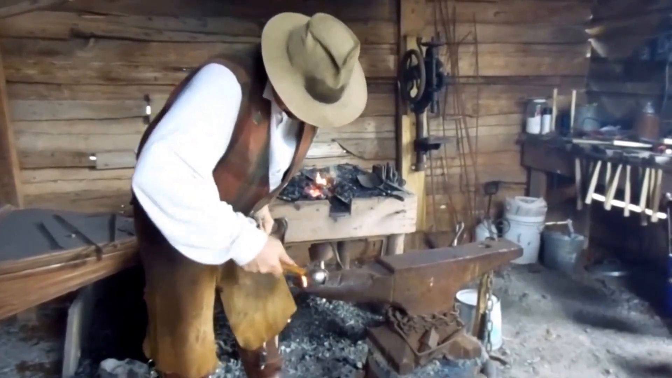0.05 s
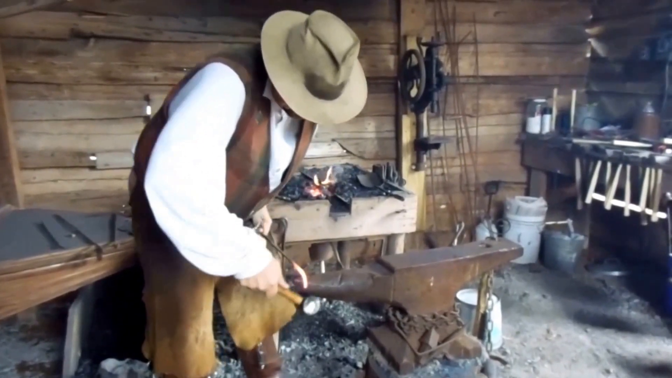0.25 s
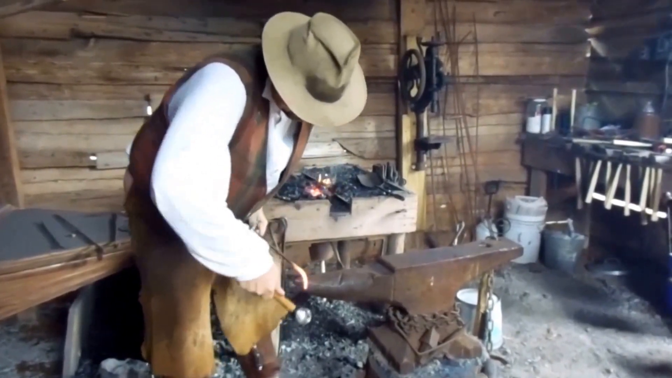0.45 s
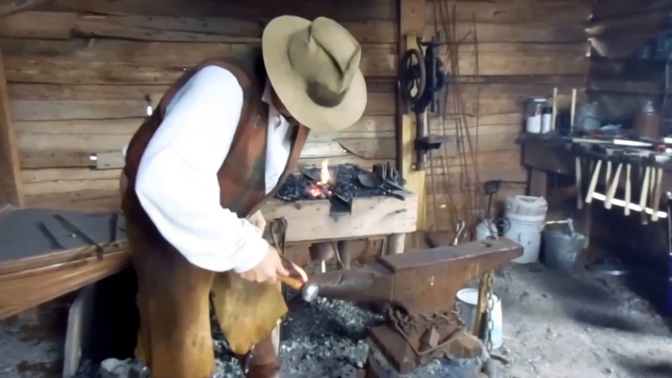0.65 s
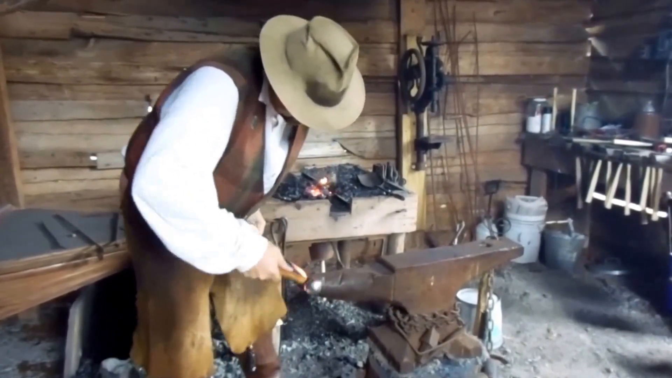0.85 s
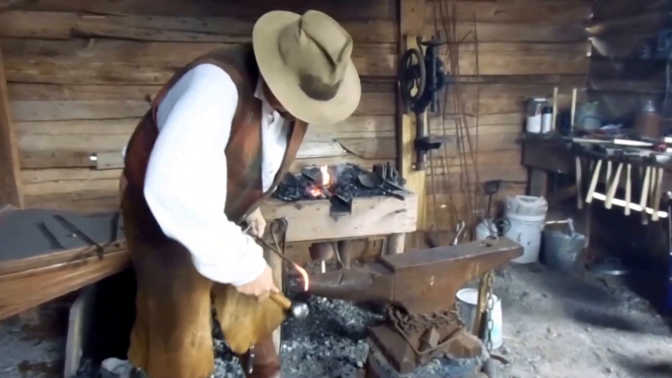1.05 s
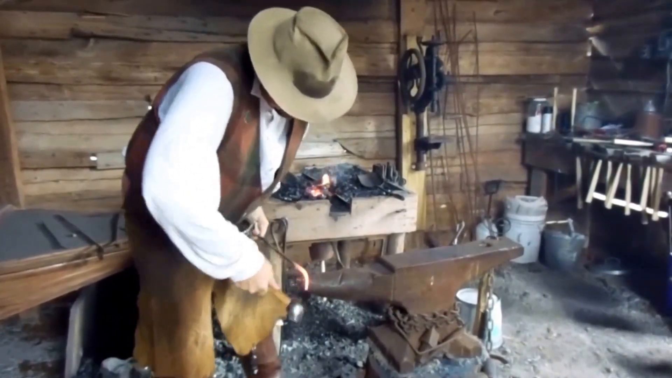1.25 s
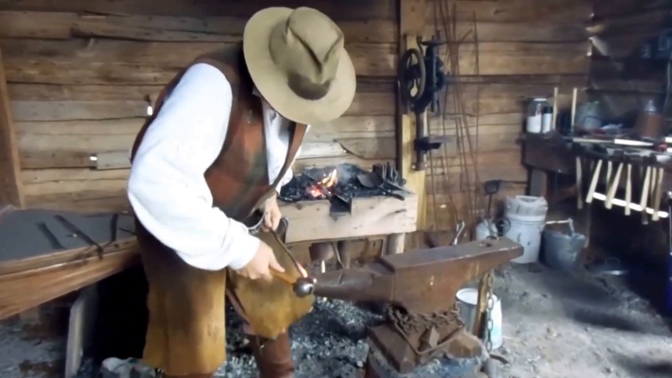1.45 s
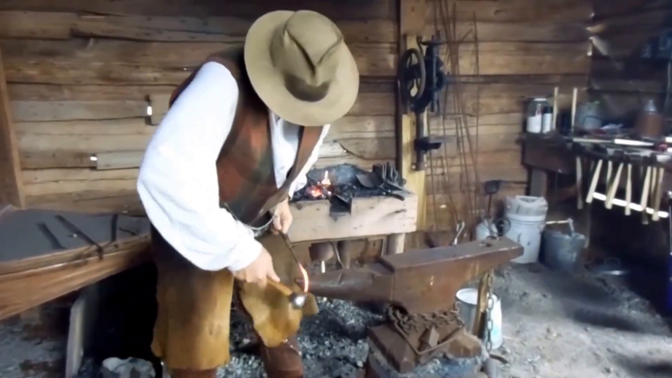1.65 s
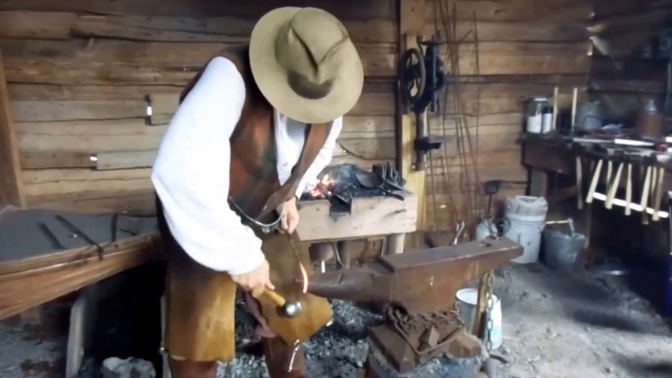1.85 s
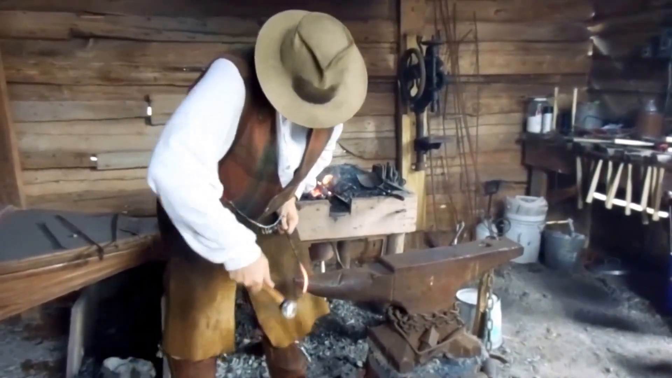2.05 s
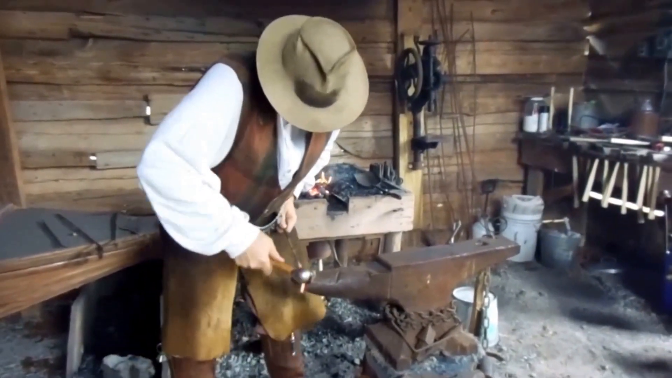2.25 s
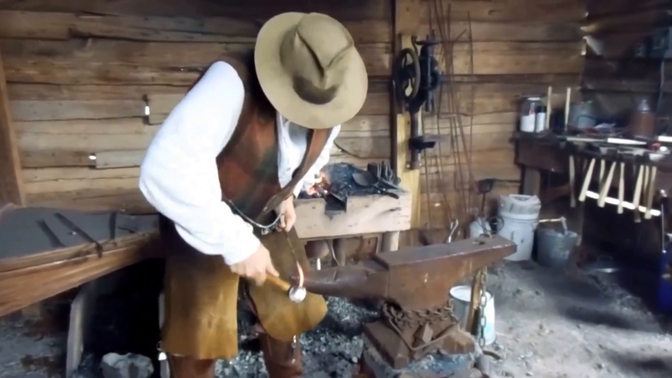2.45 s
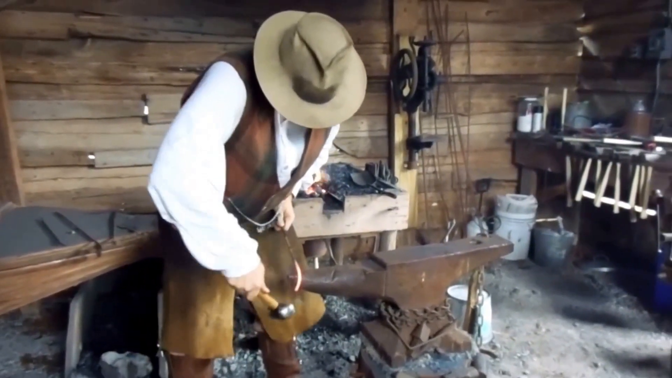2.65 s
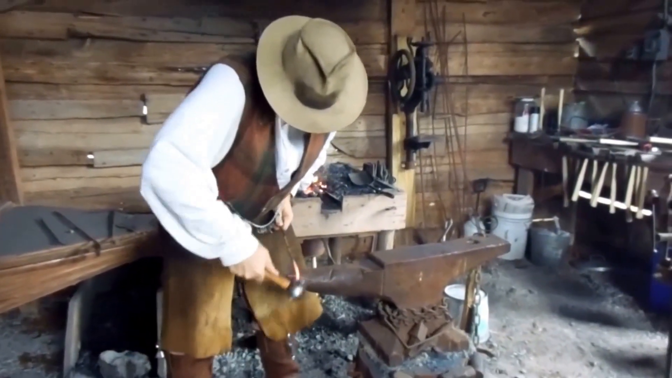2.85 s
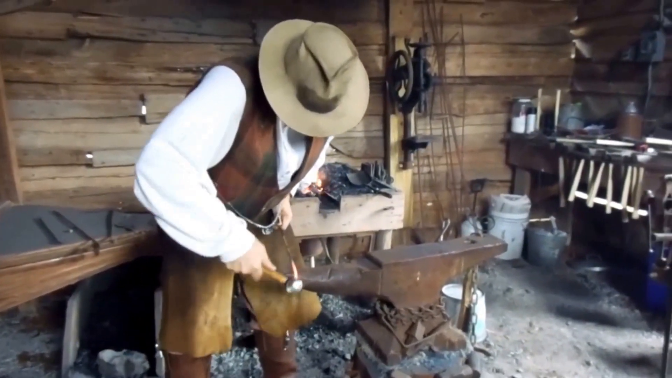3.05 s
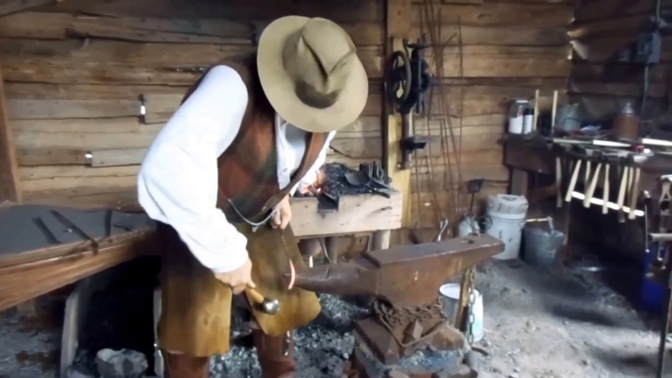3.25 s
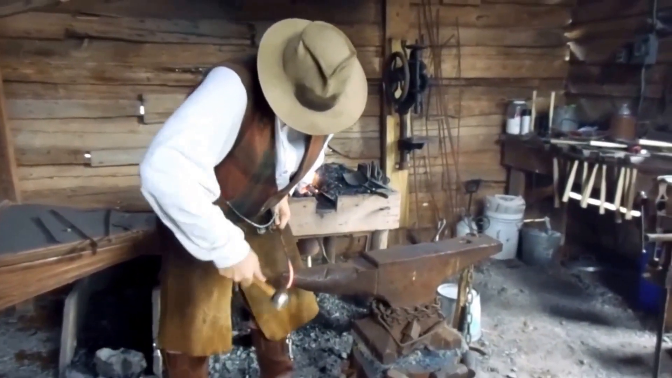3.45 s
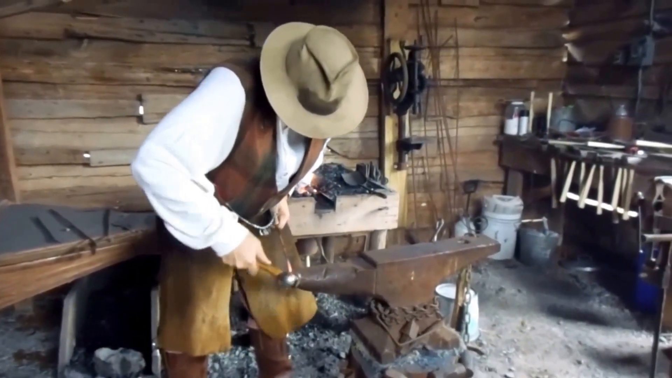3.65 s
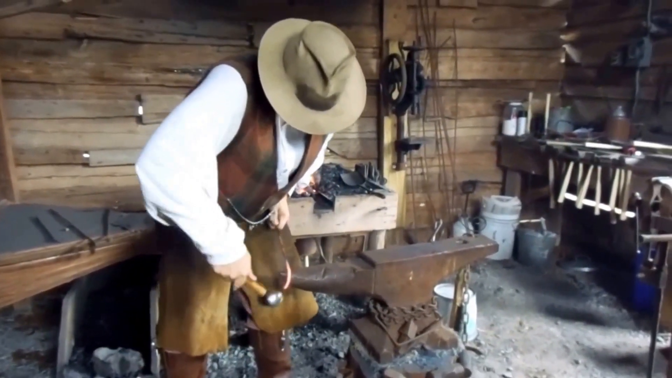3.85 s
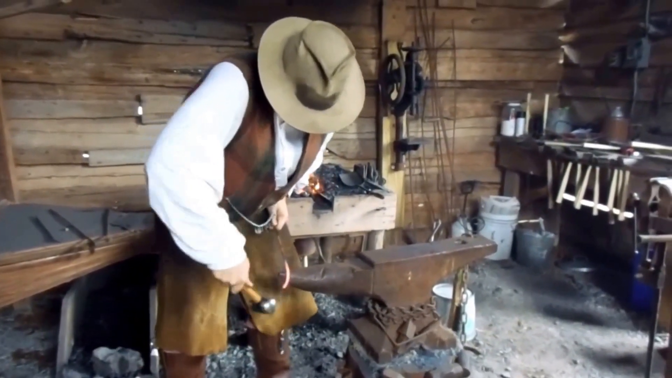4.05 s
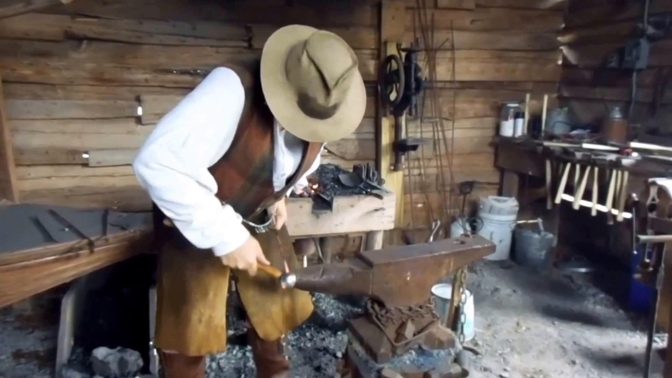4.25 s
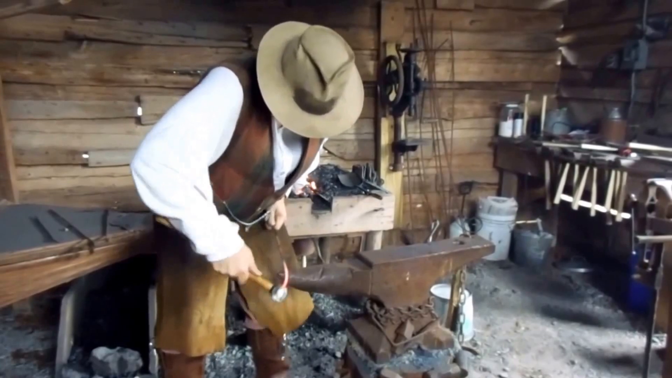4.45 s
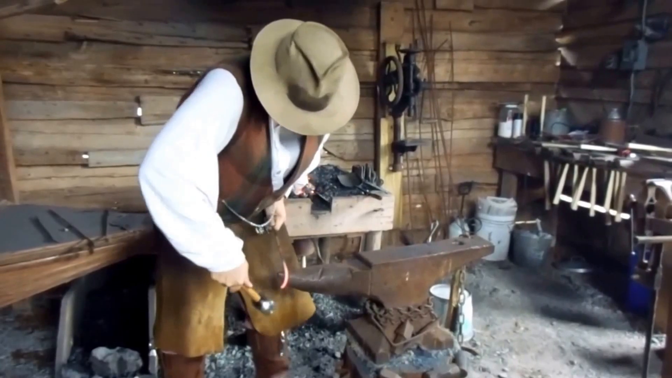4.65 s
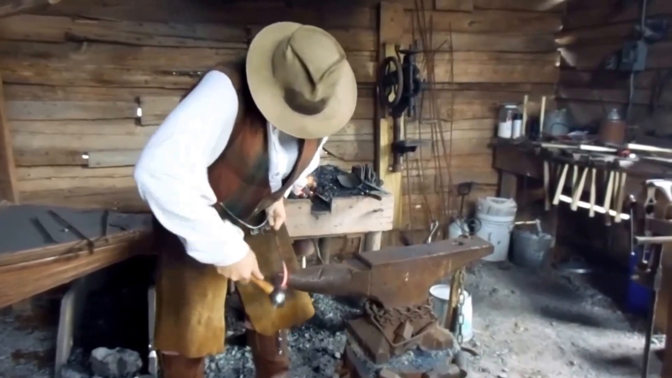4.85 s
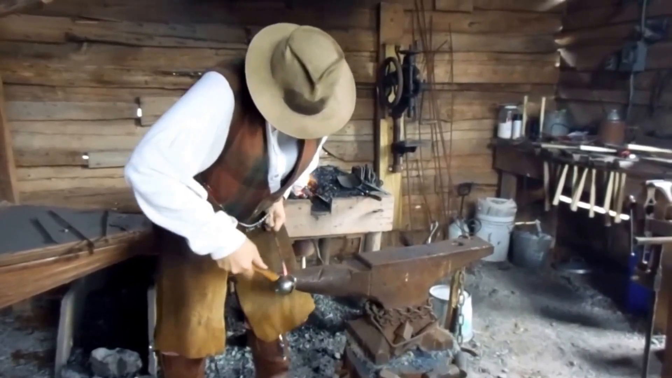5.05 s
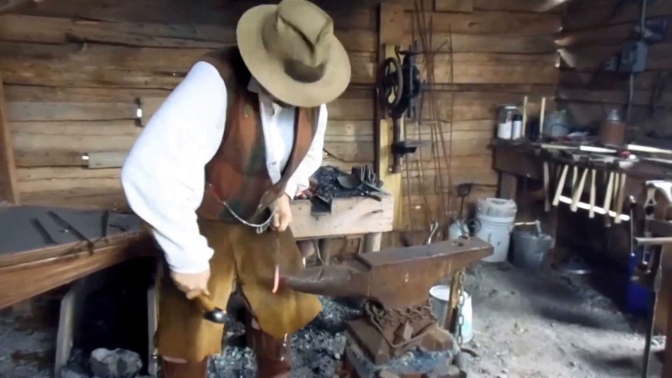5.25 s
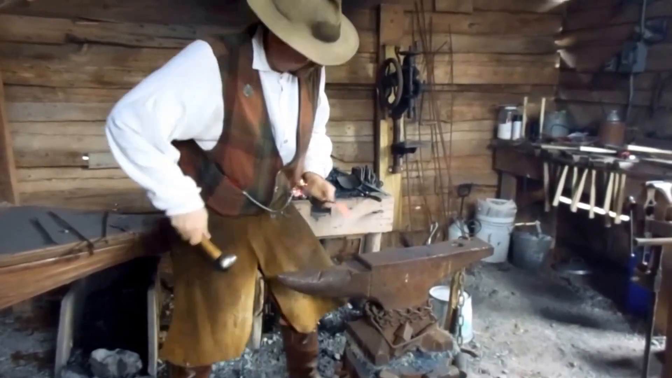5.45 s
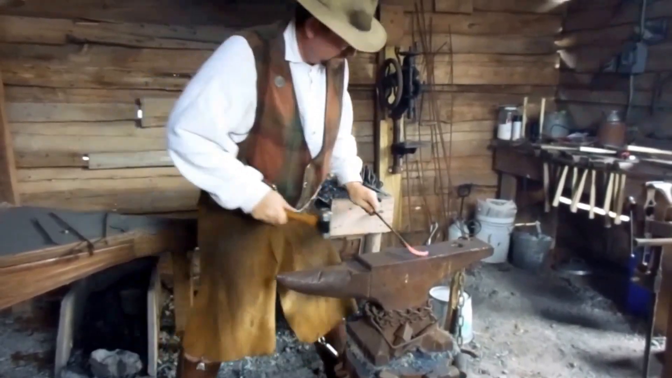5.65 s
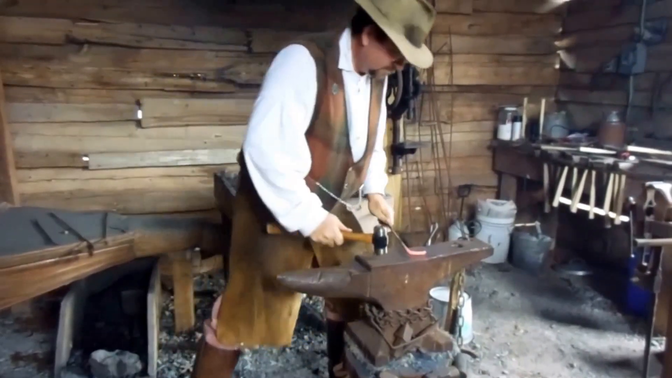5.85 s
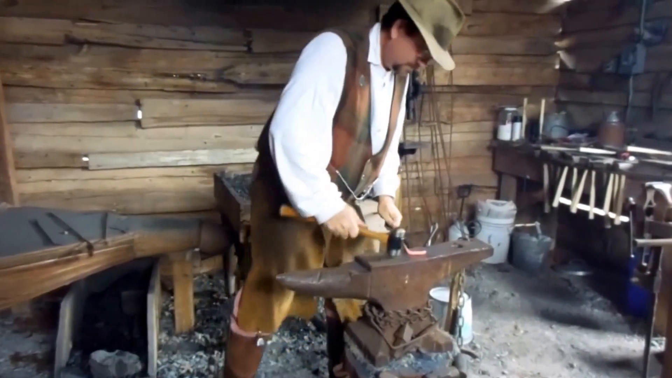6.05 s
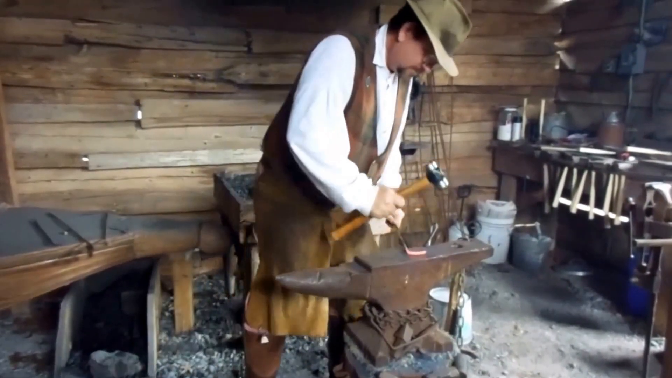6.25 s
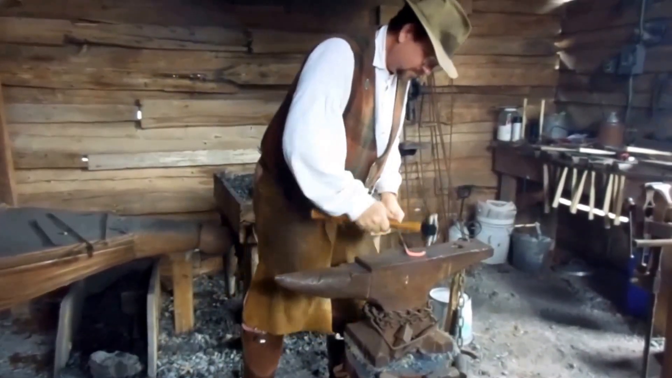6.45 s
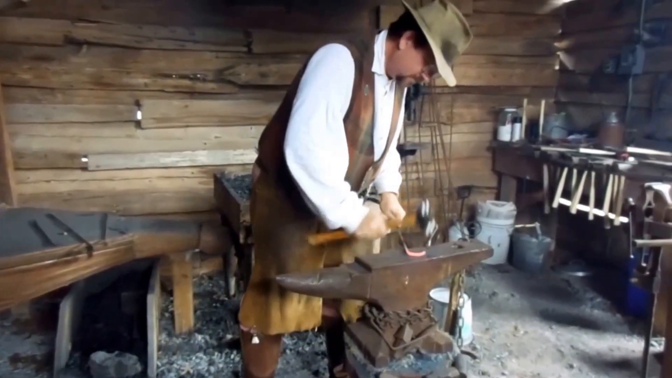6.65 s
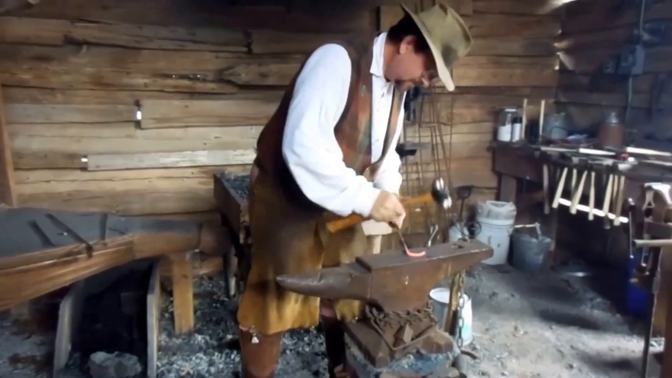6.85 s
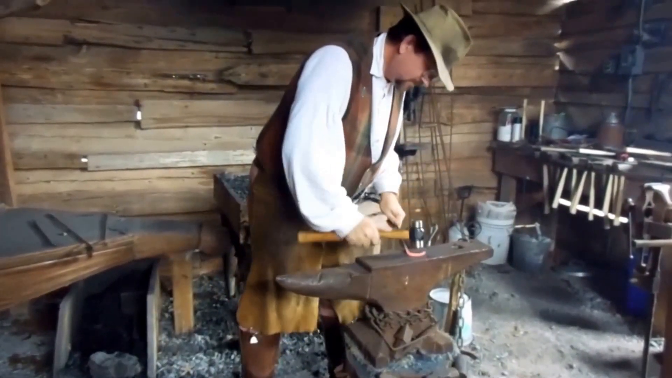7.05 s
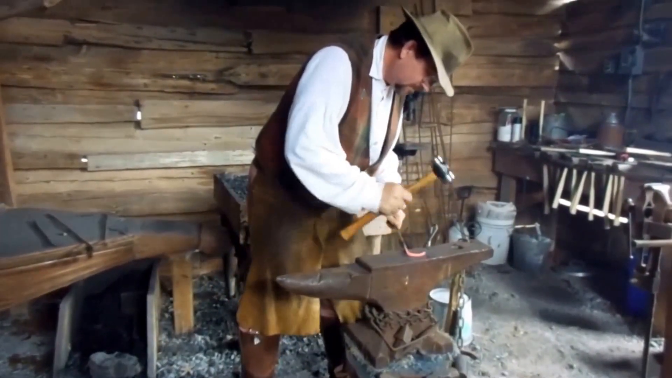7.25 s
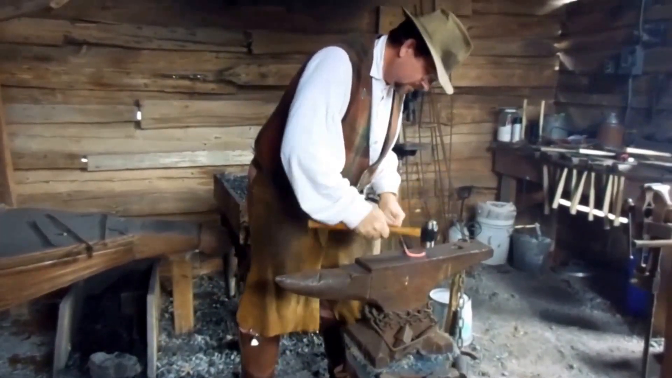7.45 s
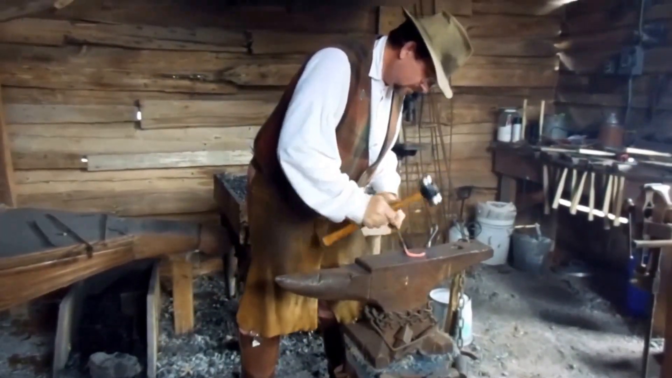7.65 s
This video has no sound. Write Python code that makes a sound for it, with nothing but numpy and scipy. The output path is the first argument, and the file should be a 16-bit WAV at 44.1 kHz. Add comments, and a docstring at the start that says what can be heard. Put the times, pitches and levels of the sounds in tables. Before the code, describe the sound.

Close up in a small wooden forge, a hammer hits hot iron on an anvil horn about three and a half times a second, each blow a bright, short, damped clack, some with a quick bounce. After five seconds it pauses; tongs clink, metal scrapes and boots crunch gravel. Two light taps follow, then four slower, heavier blows ring longer with more thud. A fire rumbles softly behind, in stereo.

```python
"""Smith at the anvil

A smith hammers a hot iron bar, first round the horn of an anvil, then on its face, in a small log workshop.
Each blow is a burst of noise bands that cracks, thuds into the stump and sets the anvil's modes ringing.
Between blows the tongs clink and scrape, tiny high chirps sound and boots shift on the gravel.
The forge fire, shaped noise, rumbles and hisses behind; two microphone ports hear the work and the room."""
import sys
import numpy as np
from scipy import signal
from scipy.fft import rfft, irfft, next_fast_len
from scipy.io import wavfile

SR = 44100
rng = np.random.default_rng(int(sys.argv[2]) if len(sys.argv) > 2 else 0)


def transcribe(signal):
    """Save signal, clipped to [-1, 1], as a 16-bit WAV file at the path in sys.argv[1]."""
    frames = np.atleast_2d(signal).T
    limited = np.clip(frames, -1, 1)
    pcm = np.round(limited * 32767).astype(np.int16)
    wavfile.write(sys.argv[1], SR, pcm)


N = 339570


def amp(db):
    """Decibels to gain."""
    return 10 ** (np.asarray(db) / 20)


def rms_one(x):
    """Scaled to rms 1."""
    return x / np.sqrt(np.mean(x ** 2) + 1e-20)


def at_hz(points, hz):
    """A table over frequency, read on a log axis."""
    points = np.array(points)
    return np.interp(np.log(hz), np.log(points[:, 0]), points[:, 1])


def band(x, low_hz, high_hz):
    """Band-pass."""
    return signal.sosfilt(signal.butter(2, [low_hz, high_hz], "band", fs=SR, output="sos"), x)


def grainy(shape, swing_db, most):
    """White noise with exponentially distributed gains in dB, so that rare grains stand out."""
    noise = rng.standard_normal(shape)
    return noise * amp(swing_db * np.minimum(rng.exponential(1, shape), most))


def swell(start, length, db, power=2):
    """A smooth rise and fall."""
    progress = np.clip((np.arange(N) / SR - start) / length, 0, 1)
    return amp(db) * np.sin(np.pi * progress) ** power


def clicks(seconds, db):
    """Impulses of given levels at given times."""
    out = np.full(N, 1e-18)
    np.add.at(out, np.round(np.asarray(seconds) * SR).astype(int), amp(db))
    return out


def chatter(x, noise, db, seconds):
    """After each click loose steel keeps touching: noise that fades with the given time constant."""
    fade = signal.lfilter([0, 1], [1, -np.exp(-1 / (seconds * SR))], x)
    return x + amp(db) * noise * fade


def ring(x, hz, t60):
    """A two-pole resonator: a unit click sets a decaying sine of starting height 1 ringing."""
    r, w = amp(-60 / (t60 * SR)), 2 * np.pi * hz / SR
    return signal.lfilter([0, np.sin(w)], [1, -2 * r * np.cos(w), r * r], x)


ON_FACE_FROM_S = 5.48  # the work moves from the horn to the face


def struck(modes, seconds, family_db, edges_hz, spread_db, chatter_db, chatter_s, t60_shares):
    """Every hit strikes every mode with the strength of its family and a little chance.
    t60_shares(Hz) scales the decay before and after the work moves to the face."""
    luck = rng.normal(0, spread_db, (len(seconds), len(modes)))
    noise = rms_one(grainy(N, 4.7, 6))
    family = np.searchsorted(edges_hz, np.array(modes)[:, 0])
    move = int(ON_FACE_FROM_S * SR)
    out = 0
    for k, (hz, db, t60) in enumerate(modes):
        hits = clicks(seconds, family_db[family[k]] + db + luck[:, k])
        touch = chatter(hits, noise, chatter_db, chatter_s)
        early, late = t60_shares(hz)
        on_horn = ring(touch[:move], hz, t60 * early)
        on_face = ring(touch[move:], hz, t60 * late)
        out = out + np.r_[on_horn, on_face]
    return out


# how alike diffuse sound is at the left and right port: (frequency [Hz], likeness [0-1])
LIKENESS = [(60, 0.98), (500, 0.93), (2000, 0.78), (5000, 0.28), (13000, 0.037)]


def diffuse(length, shape):
    """Half-octave bands of partly alike stereo noise, each multiplied by shape(centre Hz)."""
    edges = 22 * 2 ** np.arange(0, 10, .5)
    white = rng.standard_normal((2, 2, length))
    out = 0
    for k, (low, high) in enumerate(zip(edges, edges[1:])):
        centre = np.sqrt(low * high)
        mid, side = band(white[k % 2], low, high)
        alike = np.clip(at_hz(LIKENESS, centre), 0, 1)
        stereo = np.sqrt(1 + alike) * mid + np.sqrt(1 - alike) * side * [[1], [-1]]
        out = out + shape(centre) * stereo
    return out


# vigour of the fire: (time [s], relative level [dB])
FORGE = [(0, 4), (1.0, 6), (1.7, 3.5), (2.15, -1), (4, -4.5), (4.9, -1), (5.4, -6.5), (6.1, 5), (6.8, -3),
         (7.7, -1.5)]
# colour of the fire: (frequency [Hz], relative level per Hz [dB])
FIRE = [(20, -5), (38, -4.5), (60, -5.5), (120, -10), (240, -16.5), (400, -21), (600, -26.5), (950, -28.5),
        (1500, -36.5), (2600, -39), (5000, -41), (8500, -43.5), (13500, -42.5)]
FIRE_DB, RUMBLE_FOLLOWS, HISS_FOLLOWS = -45.5, 0.3, 0.76  # rms level; shares of the roar's swing
WHINE_HZ, WHINE_WIDTH_HZ, WHINE_DB = 13190, 160, -77
HUM_LOW_HZ, HUM_HIGH_HZ = 120.3, 126.315
HUM_START_S, HUM_LENGTH_S, HUM_DB = 5.92, .36, -44


def forge():
    """Rumble, roar and hiss of the fire follow its vigour unequally; a faint whistle and a brief hum lie on top."""
    vigour = np.interp(np.arange(N) / SR, *np.transpose(FORGE))

    def colour(hz):
        follows = np.interp(np.log(hz), np.log([80, 500, 5000]), [RUMBLE_FOLLOWS, 1, HISS_FOLLOWS])
        return amp(at_hz(FIRE, hz) + follows * vigour)

    fire = rms_one(diffuse(N, colour))
    half_width = WHINE_WIDTH_HZ / 2
    whine = rms_one(band(rng.standard_normal(N), WHINE_HZ - half_width, WHINE_HZ + half_width))
    hum = rms_one(band(rng.standard_normal(N), HUM_LOW_HZ, HUM_HIGH_HZ))
    hum = hum * swell(HUM_START_S, HUM_LENGTH_S, HUM_DB, power=0.47)
    return amp(FIRE_DB) * fire + amp(WHINE_DB) * whine + hum


# hammer blows, all levels relative: (time [s], bright crack [dB], dull crack [dB], ring at 1400 Hz [dB],
# ring of the 1500 Hz pair [dB], of the 1600-2000 Hz pair [dB], of the body [dB], at 12 kHz [dB])
BLOWS = [(0.1169, -8, -33, -41.5, -22, -57, -36, -25), (0.3942, -7.5, -40, -41.5, -21, -50, -38, -22.5),
         (0.6582, -4.5, -44.5, -35, -25.5, -65, -45, -29), (0.9181, -7.5, -39, -39, -25, -35, -31.5, -25),
         (1.2103, -4.5, -32, -38, -15.5, -38.5, -31, -57), (1.4935, -1, -31.5, -30, -18.5, -54, -27, -38),
         (1.7787, -2.5, -34.5, -46, -25.5, -53, -33.5, -48), (2.039, -0.5, -38, -47, -27, -63, -40, -36),
         (2.3135, -10.5, -42, -52, -41.5, -40, -32.5, -48),
         (2.5914, -3, -52.5, -51.5, -42.5, -42.5, -28, -49),
         (2.8696, -8, -44.5, -59, -39.5, -60.5, -35.5, -51), (3.1573, -4, -45, -57.5, -38.5, -64, -36, -34),
         (3.4439, -7.5, -52, -44, -32.5, -38, -36, -57), (3.7314, -3.5, -38, -41.5, -38, -37, -34.5, -52),
         (4.0105, -7.5, -53, -42.5, -30, -36.5, -39, -53), (4.2914, -8, -41.5, -43, -27, -36, -35.5, -50),
         (4.575, -4, -58, -38.5, -27.5, -39, -36, -61), (4.8486, -3, -39, -48, -35, -35, -37.5, -57),
         (5.1297, -2.5, -43.5, -44, -25, -38, -41.5, -64),
         (5.8612, -41, -25.5, -24.5, -25.5, -30, -18, -50), (5.9667, -11, -50.5, -29, -61, -44, -18, -35),
         (6.0186, -43, -65, -30, -46, -38, -29, -34.5), (6.3697, 2.5, -23.5, -34, -23.5, -33, -36, -58),
         (6.7034, 4, -24.5, -31.5, -23, -52, -34.5, -38), (7.049, -6, -25.5, -28, -32, -26, -23.5, -21.5),
         (7.4057, -8, -23.5, -25.5, -53.5, -26, -22, -21.5)]
# the hammer bounces and lands again: (time [s], relative level of the bright crack [dB])
REBOUNDS = [(0.9314, -3.5), (1.2213, -2), (1.504, 3.5), (1.7874, -23), (2.0467, -13), (2.3339, -16),
            (2.6135, -14), (2.891, -21.5), (3.4643, -14.5)]
REBOUND_DULL_LOSS_DB, REBOUND_RING_LOSS_DB = 17, 5.5  # against the blow before


def contacts():
    """Blows, then rebounds: each has its own bright crack, but less dull crack and ring than the blow before."""
    blows, rows = np.array(BLOWS), []
    for s, bright in REBOUNDS:
        before = blows[np.searchsorted(blows[:, 0], s) - 1]
        dull = before[2] - REBOUND_DULL_LOSS_DB
        rings = before[3:] - REBOUND_RING_LOSS_DB
        rows.append([s, bright, dull, *rings])
    return np.vstack([blows, rows]).T


THUD_DB, THUD_FOLLOWS = -22.5, 0.34  # thud into the stump under a 0 dB dull crack; share of its swing


def stump_thud(dull):
    """The wooden stump takes up part of the dull crack's swing; gives the thud in dB."""
    return THUD_DB + THUD_FOLLOWS * dull


# modes of the anvil, the lowest five from its wooden stump:
# (frequency [Hz], relative level [dB], t60 on the face [s])
ANVIL = [(137, -6, .11), (190, -3, .07), (250, -3, .07), (324, -4, .09), (400, -6, .06), (870, -12, .08),
         (1030, -13, .07), (1398, 0, .26), (1501, -1, .12), (1545, -9, .1), (1591, 0, .19), (2015, -8, .15),
         (3033, -4, .21), (3111, 1.5, .22), (3225, -8, .14), (3978, -2, .19), (4689, -12, .2),
         (5069, 1, .18), (5363, -5, .22), (6213, 3, .2), (6381, -2, .4), (6633, 4, .15), (7117, -7, .18),
         (8560, 0, .14), (9717, -3, .1), (11110, -9, .24), (12122, -1, .2), (13260, -8, .13)]
# borders between the families of modes that share one strength: (frequency [Hz])
FAMILY_EDGES_HZ = [600, 1200, 1450, 1550, 2500, 3500, 4500, 5800, 6300, 6500, 7500, 10500, 11500, 12600]
# share of the body ring in the families 3, 4, 5, 6.2, 6.4, 6.6, 8.5, 11 and 13 kHz, on horn and face: (level [dB])
BODY_FROM_HORN = [0.5, -0.5, -9, -18.5, -16.5, -11.5, -11, -19, -17.5]
BODY_FROM_FACE = [-1.5, -1.5, -5.5, -14.5, -5.5, -17, -16, -4.5, -19.5]
# how far each of these families follows the 12 kHz ring instead of the body: (share [0-1])
WITH_TREBLE = [0, 0, 0, 0, .4, 0, 0, .5, 0]
KNOCK_DB = 0.5  # the modes near 900 Hz against the dull crack
# the bar held against the horn shortens the rings, the upper ones most
HORN_T60_SHARE, HORN_LOW_T60_SHARE, HORN_DAMPS_ABOVE_HZ = .5, .8, 2500
TOCK_S, TOCK_DB, TOCK_HZ, TOCK_T60_S = 3.2455, -35, 980, 0.02  # one small dull knock between blows


def anvil():
    """Each contact sets decaying modes of anvil and stump ringing, damped while the bar lies on the horn."""
    s, _, dull, lowest, pair, upper_pair, body, treble = contacts()
    from_body = np.where(s > ON_FACE_FROM_S, np.c_[BODY_FROM_FACE], np.c_[BODY_FROM_HORN])
    *others, top = body + np.c_[WITH_TREBLE] * (treble - body) + from_body
    family_db = [stump_thud(dull), dull + KNOCK_DB, lowest, pair, upper_pair, *others, treble, top]

    def t60_shares(hz):
        return (HORN_T60_SHARE if hz > HORN_DAMPS_ABOVE_HZ else HORN_LOW_T60_SHARE), 1

    out = struck(ANVIL, s, family_db, FAMILY_EDGES_HZ, spread_db=2.5,
                 chatter_db=-31.5, chatter_s=0.02, t60_shares=t60_shares)
    return out + ring(clicks([TOCK_S], [TOCK_DB]), TOCK_HZ, TOCK_T60_S)


GRAZE_DB, GRAZE_S, CRACK_MS = -10.5, .0016, 2.36  # first touch against the landing; its length; the crack's fade
RATTLE_DB, RATTLE_YIELDS = -29.5, .25  # the bar rattles less against the crack, the harder the blow pins it
MIDDLE_FACE_DB, MIDDLE_WITH_BODY = -9.5, 0.33  # on the face the middle crack follows the body ring
MIDDLE_HORN_DB, MIDDLE_FOLLOWS = -30.5, 0.42  # on the horn: under a 0 dB bright crack; share of its swing


def hammer():
    """The hammer grazes the scale, then lands: a noise burst in four bands, with the loose bar's grainy rattle."""
    s, bright, dull, _, _, _, body, _ = contacts()
    on_face = s > ON_FACE_FROM_S
    middle_on_face = MIDDLE_FACE_DB + MIDDLE_WITH_BODY * body
    middle = np.where(on_face, middle_on_face, MIDDLE_HORN_DB + MIDDLE_FOLLOWS * bright)
    thud = stump_thud(dull)
    rattle = RATTLE_DB - RATTLE_YIELDS * np.where(on_face, 0, bright)

    t = np.arange(SR // 4) / SR
    fade = np.exp(-np.maximum(t - GRAZE_S, 0) * 1000 / CRACK_MS)
    landing = np.where(t < GRAZE_S, amp(GRAZE_DB), fade)
    out = np.zeros(N)
    for k, start in enumerate(np.round((s - .0014) * SR).astype(int)):
        rattling = amp(rattle[k] - 60 * t / 0.18) * (t > GRAZE_S) * grainy(len(t), 4.9, 4)
        crack = landing * rng.standard_normal(len(t)) + rattling
        # neighbouring bands alternate in sign so that they join without a notch;
        # narrow bands pass less noise and get more gain
        burst = amp(bright[k] - 4.0) * band(crack, 6900, 13200)
        burst -= amp(middle[k] + 14.0) * band(crack, 1780, 6020)
        burst += amp(dull[k] + 21.5) * band(crack, 643, 1940)
        burst -= -amp(thud[k] + 28.0) * band(crack, 163, 340)  # the thud lies apart and keeps its sign
        out[start:start + len(t)] += burst
    return out


# tiny high chirps, perhaps from the anvil's chain: (time [s], relative level [dB])
CHIRPS = [(.229, -58), (.309, -51), (.587, -50), (2.199, -50), (2.8, -79), (3.089, -58.5), (3.4, -61.5),
          (3.869, -58.5), (5.019, -56), (5.074, -58.5), (5.492, -56), (6.186, -41.5), (6.627, -47.5),
          (6.908, -55.5), (7.017, -49), (7.335, -51), (7.556, -49.5)]
# modes of the chain: (frequency [Hz], relative level [dB], t60 [s])
CHAIN = [(8500, -4, 0.032), (8630, -5, .04), (10550, -1, .03)]
UPPER_LINK_DB = -9  # the mode above 9500 Hz against the others


def chain():
    """Faint clicks set three short high modes chirping."""
    s, db = np.transpose(CHIRPS)
    return struck(CHAIN, s, [db, db + UPPER_LINK_DB], [9500], spread_db=3.5,
                  chatter_db=-25, chatter_s=0.01, t60_shares=lambda hz: (1, 1))


# clinks of the tongs, levels relative: (time [s], tick [dB], low prong [dB], high prongs [dB])
CLINKS = [(.5387, -38, -70, -68), (.842, -23, -46.5, -64), (1.379, -28, -42, -38.5),
          (1.444, -13.5, -38, -58), (1.6513, -30, -46, -51), (1.6642, -39.5, -36.5, -39),
          (1.6885, -35, -56, -42.5), (1.709, -38, -53, -56), (1.9874, -38, -52, -44.5),
          (2.0611, -25, -29.5, -50), (2.2503, -46.5, -58, -60), (2.405, -26, -38.5, -47),
          (2.5321, -29, -42.5, -46), (5.097, -39, -54.5, -57), (5.343, -50, -49.5, -63.5),
          (5.5158, -12, -42, -54), (5.5479, -40, -39.5, -35.5), (5.6502, 1, -31, -31.5),
          (5.668, -17, -44.5, -58), (5.688, -1, -42, -50), (5.712, -24.5, -39, -42), (5.755, -11, -45, -36),
          (5.817, -33, -51, -45), (5.9055, -6.5, -36, -42), (5.95, -30, -28.5, -38),
          (6.0453, -25, -42.5, -41), (6.1306, -32, -56, -50.5), (6.219, -31, -65, -53),
          (6.273, -21, -46.5, -48), (6.321, -34, -48.5, -43), (6.338, -23, -41.5, -48)]
# modes of the tongs: (frequency [Hz], relative level [dB], t60 when not held [s])
TONGS = [(1814, -24, .16), (3171, -14, .15), (3528, -12, .08), (4170, -9, .1), (4262, -2, .12),
         (4350, -11, .08), (5180, -16, .1), (6142, -14, .1), (6907, -6, .15), (7531, -4, .1),
         (7612, -5, .12), (8690, -7, .12), (8840, -5, .12), (9370, -6, .12), (10550, -12, .1),
         (11630, -5, .1), (12070, -6, .1), (12880, -10, .1), (13050, -4, .1), (13140, -2, .13),
         (14170, -9, .15)]
# border between the low and high prong modes: (frequency [Hz])
PRONG_EDGES_HZ = [6000]
GRIP_T60_SHARE = 0.61  # the hand on the reins shortens the ring


def tongs():
    """Jaws and reins of the tongs tick together, a short noise burst, and ring in damped modes."""
    s, tick, *prongs = np.transpose(CLINKS)
    rings = struck(TONGS, s, prongs, PRONG_EDGES_HZ, spread_db=2.5, chatter_db=-25, chatter_s=0.025,
                   t60_shares=lambda hz: (GRIP_T60_SHARE, GRIP_T60_SHARE))
    ticks = chatter(clicks(s, tick + 1), rng.standard_normal(N), -24.0, 0.011)
    return rings + band(ticks, 4800, 21000)


# the bar dragged over the steel: (start [s], length before release [s], level [dB])
SCRAPES = [(1.448, 0.027, -37.5), (1.646, 0.055, -64), (5.638, .08, -53.5), (5.752, 0.03, -51),
           (6.07, 0.0092, -46), (6.1, 0.16, -58)]
# colour of the scrapes: (frequency [Hz], relative level per Hz [dB])
SCRAPE = [(300, -9), (700, 6), (2500, 3), (6000, 1), (14000, 0)]
SCRAPE_ATTACK_S, SCRAPE_RELEASE_DB_PER_S = .006, 510


def scrapes():
    """The bar scrapes in dense tiny clicks: grainy noise with a quick attack and release."""
    hz = np.maximum(np.fft.rfftfreq(N, 1 / SR), 1)
    grains = rms_one(irfft(rfft(grainy(N, 1.2, 5)) * amp(at_hz(SCRAPE, hz)), N))
    t = np.arange(N) / SR
    out = np.zeros(N)
    for start, length, db in SCRAPES:
        attack = np.clip((t - start) / SCRAPE_ATTACK_S, 0, 1)
        release_db = SCRAPE_RELEASE_DB_PER_S * np.maximum(t - start - length, 0)
        out += grains * attack * amp(db - release_db)
    return out


# boots shift on the gravel floor: (start [s], length [s], peak of the swell [dB])
SHUFFLES = [(1.3, 0.47, -50.5), (5.575, 0.27, -48.5), (5.781, 0.17, -47), (6.1, 0.45, -72)]


def boots():
    """Gravel crunches in dense grains under shifting feet."""
    gravel = rms_one(band(grainy(N, 7.5, 5), 350, 7000))
    return gravel * sum(swell(*row) for row in SHUFFLES)


# decay of the room: (frequency [Hz], t60 [s])
SHOP_T60 = [(150, 0.24), (700, 0.24), (2000, 0.24), (5000, 0.2), (13000, 0.16)]
# room against direct sound: (frequency [Hz], level [dB])
SHOP_DB = [(150, 2.5), (700, -7.5), (2000, -6.5), (5000, -5), (13000, -9.5)]


def shop(x):
    """Log walls return a dense tail that builds over a few ms and dies faster in the treble."""
    t = np.arange(SR // 2) / SR

    def decay(hz):
        t60 = at_hz(SHOP_T60, hz)
        unit_energy = np.sqrt(np.log(1e6) / t60 / SR)
        return amp(at_hz(SHOP_DB, hz) - 60 * t / t60) * unit_energy

    tail = diffuse(len(t), decay) * np.clip((t - .003) / 0.0033, 0, 1)
    return signal.fftconvolve(x[None], tail, axes=1)[:, :N]


# left minus right port: (frequency [Hz], level [dB])
PORT_DB = [(60, 0.5), (250, 0.5), (1000, 1.5), (2000, 1), (4500, 1), (8000, 2), (14000, -8.5)]
# how far the left port leads: (frequency [Hz], phase [rad])
PORT_LEAD = [(200, 0), (2000, -1.2), (4000, 1.5), (5100, 2), (7100, 1), (9000, 1.52), (12000, 0.56),
             (14000, 0.9)]


def ports(x):
    """The two microphone ports hear a direct sound with a level and phase of their own."""
    size = next_fast_len(N + 4096)
    hz = np.maximum(np.fft.rfftfreq(size, 1 / SR), 1)
    half = amp(at_hz(PORT_DB, hz) / 2) * np.exp(.5j * at_hz(PORT_LEAD, hz))
    return irfft(rfft(x, size) * np.array([half, 1 / half]), size)[:, :N]


def scene():
    """Direct sound through the ports, the room's tail and the fire, each leaning a little to the right."""
    fire = forge()
    near = hammer() + anvil() + chain() + tongs() + scrapes() + boots()
    # gains of the left and right port in dB
    direct = ports(near) * amp([[-1.25], [1.25]])
    room = shop(near) * amp([[-1.3], [1.3]])
    return direct + room + fire * amp([[-.7], [.7]])


CUTOFF_HZ = 14550


def record(dry):
    """The microphone's signal: peaks are rounded, the top is cut."""
    rounded = 1.45 * np.tanh(dry / 1.466)
    return signal.sosfilt(signal.cheby2(22, 60, CUTOFF_HZ, fs=SR, output="sos"), rounded)


dry = scene()
out = record(dry)
transcribe(out)
```